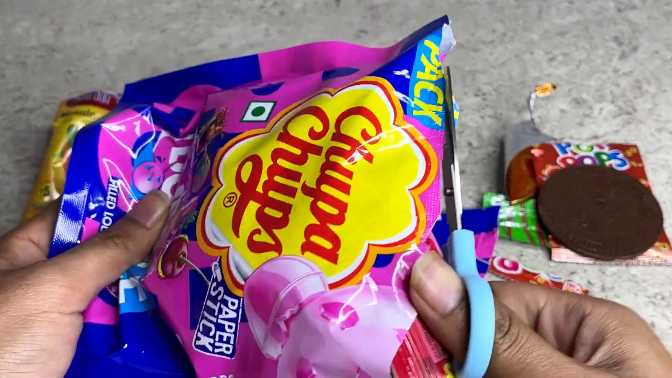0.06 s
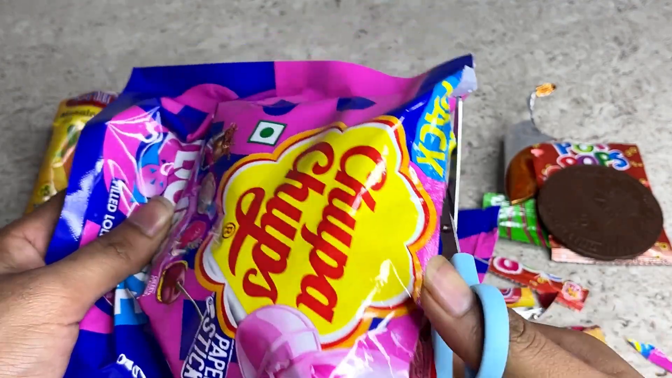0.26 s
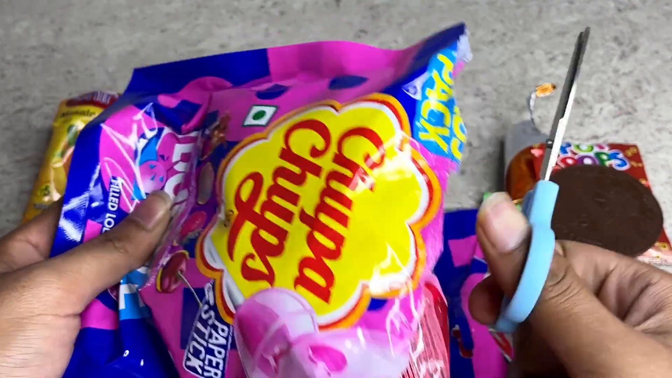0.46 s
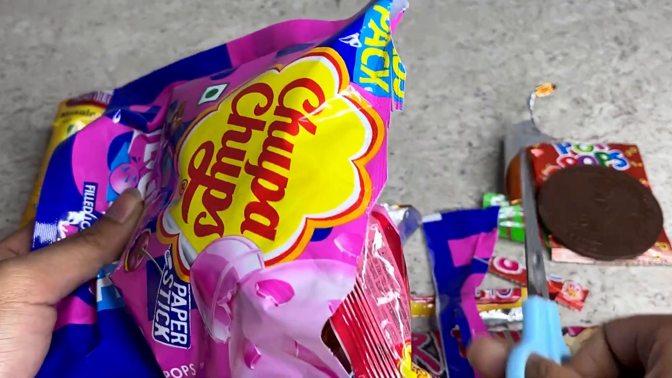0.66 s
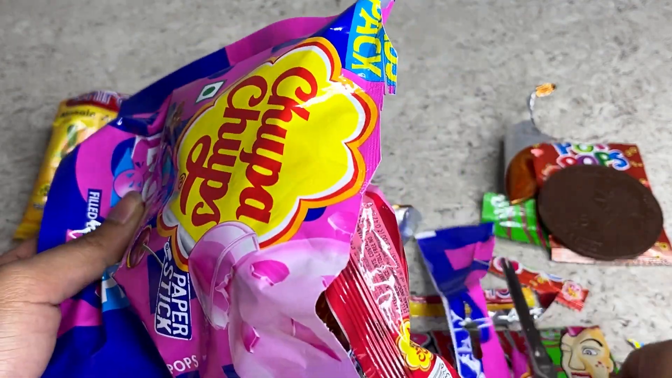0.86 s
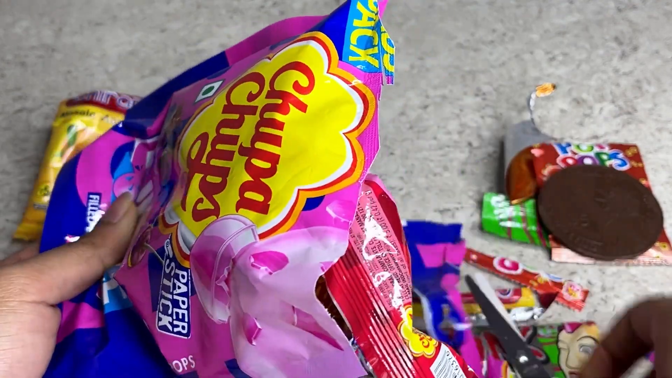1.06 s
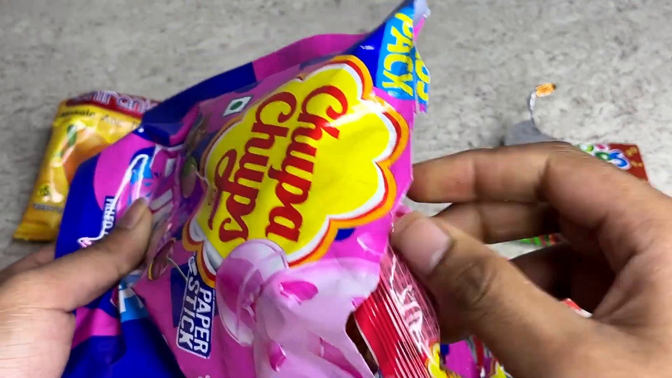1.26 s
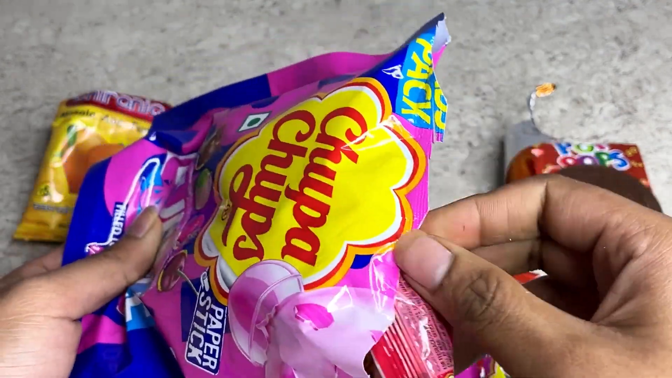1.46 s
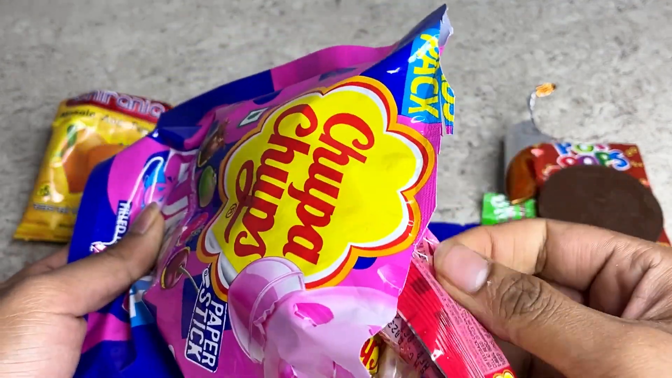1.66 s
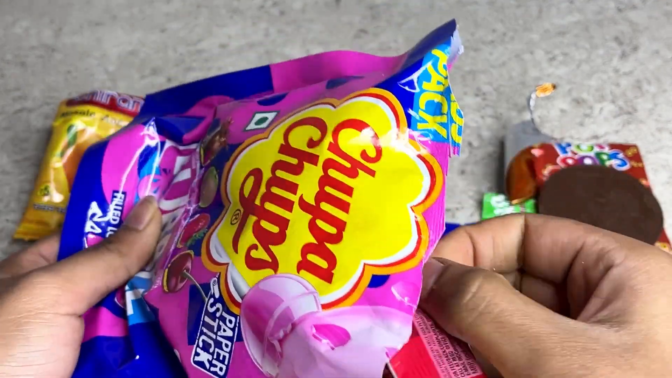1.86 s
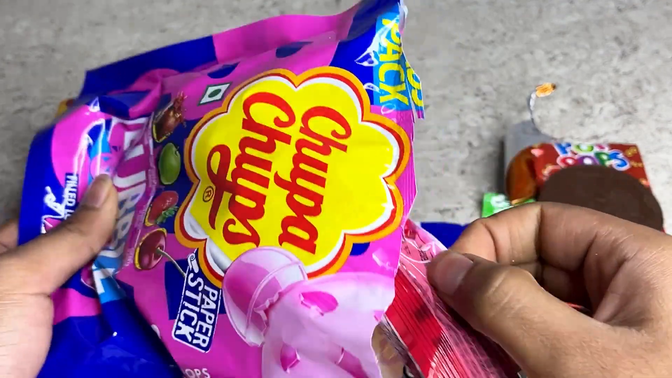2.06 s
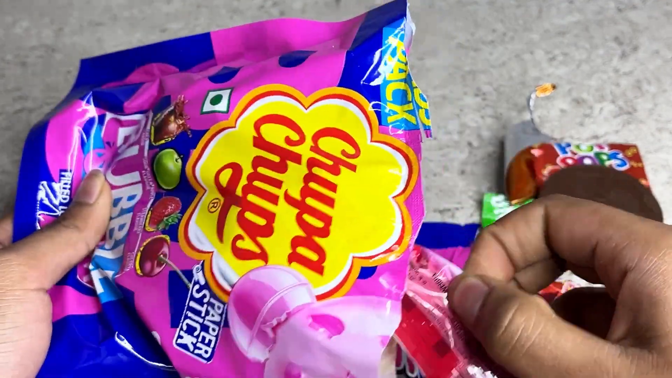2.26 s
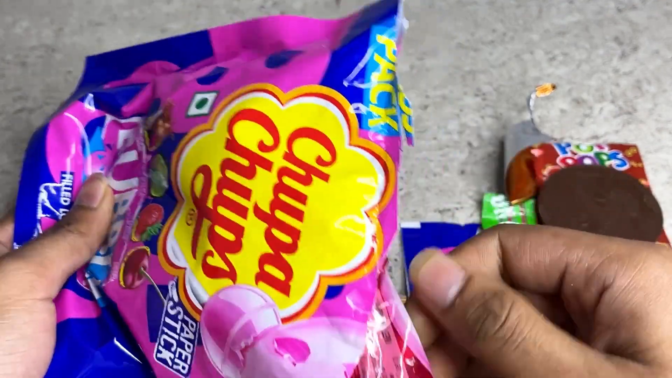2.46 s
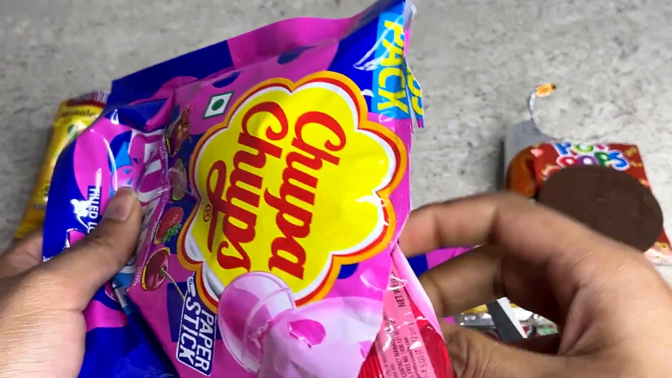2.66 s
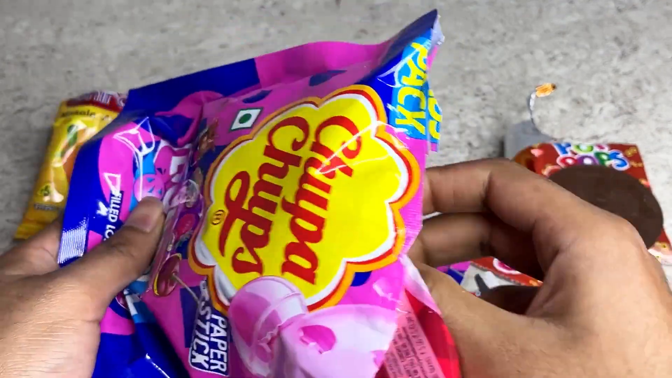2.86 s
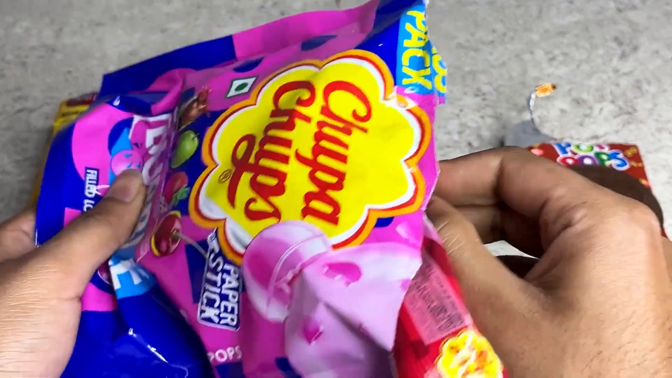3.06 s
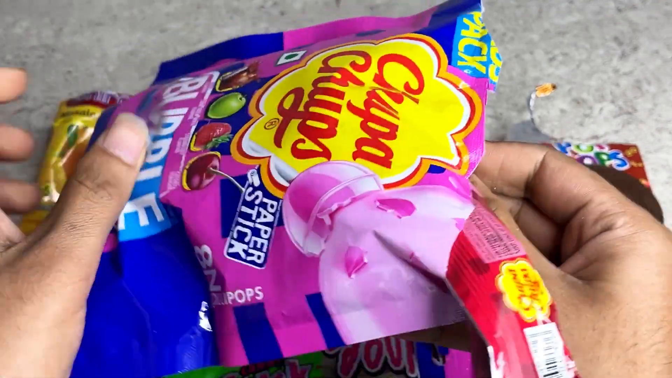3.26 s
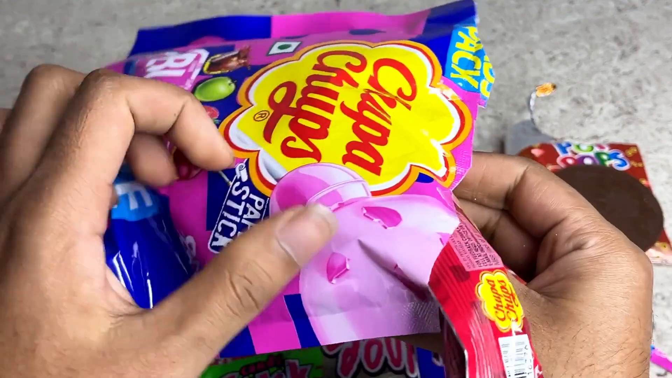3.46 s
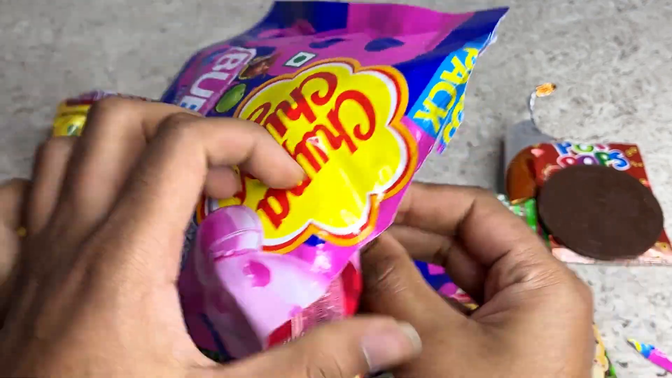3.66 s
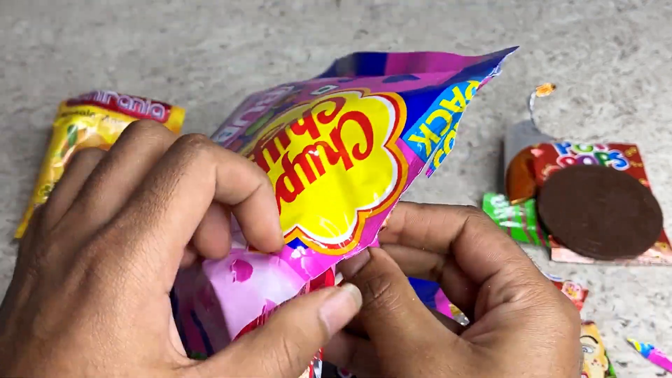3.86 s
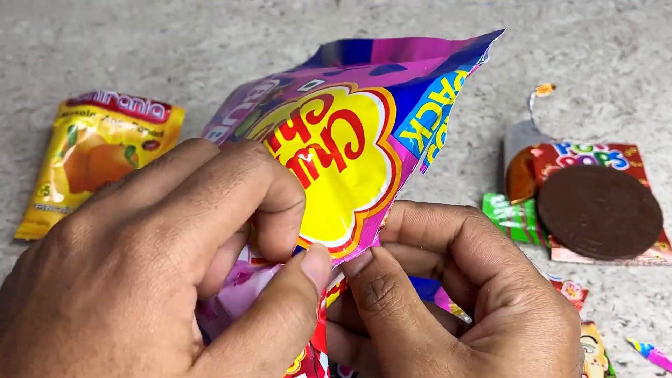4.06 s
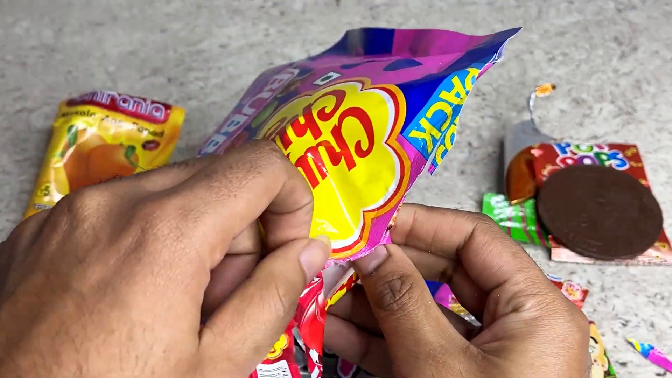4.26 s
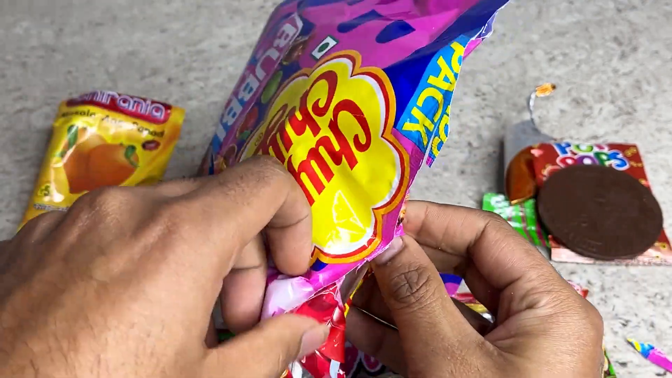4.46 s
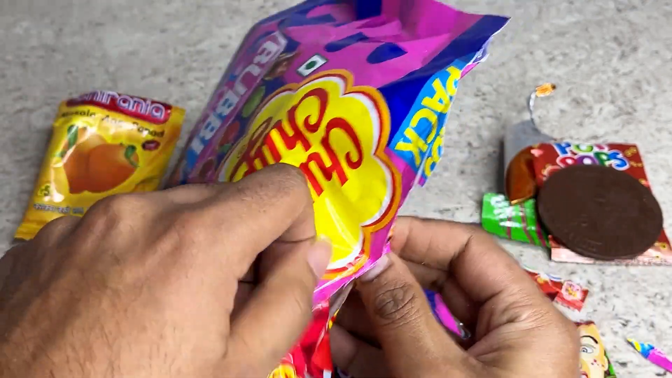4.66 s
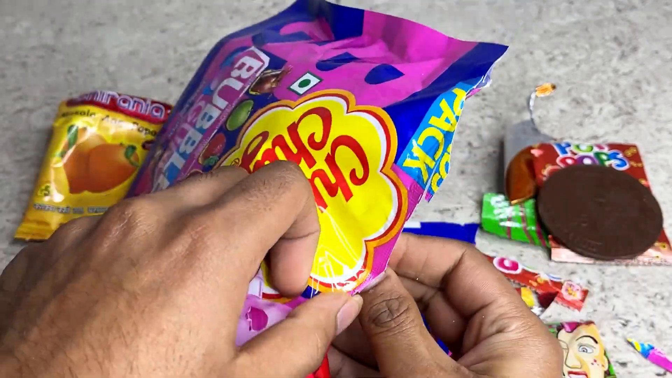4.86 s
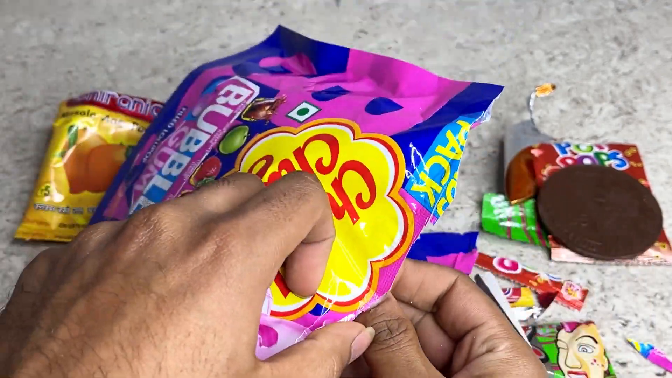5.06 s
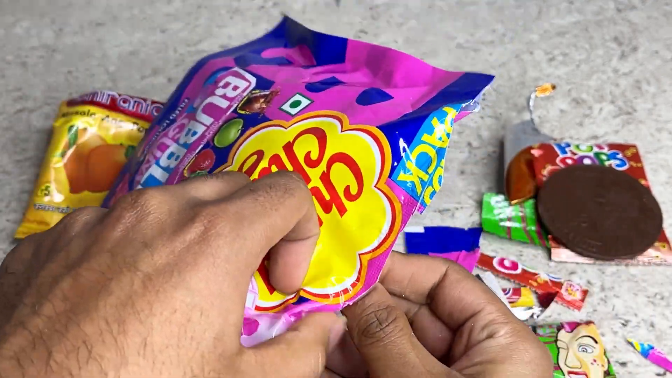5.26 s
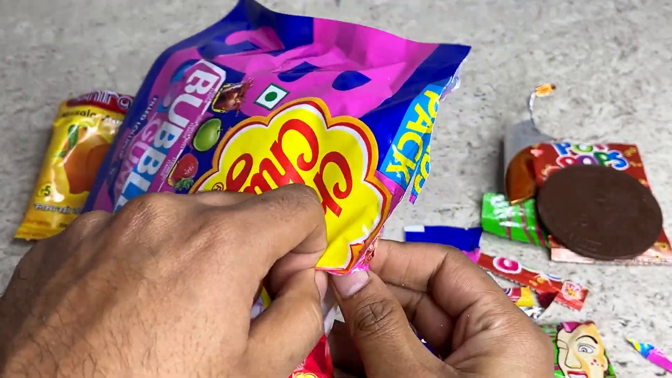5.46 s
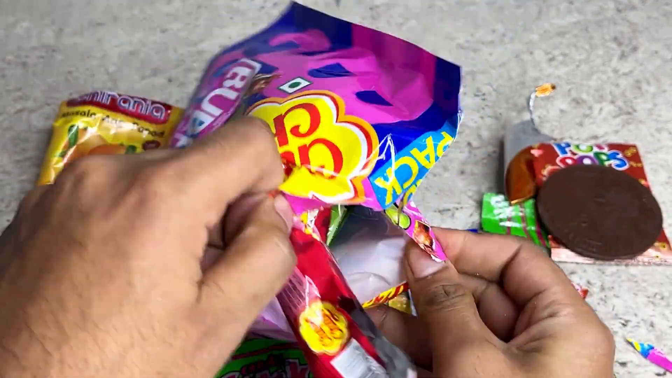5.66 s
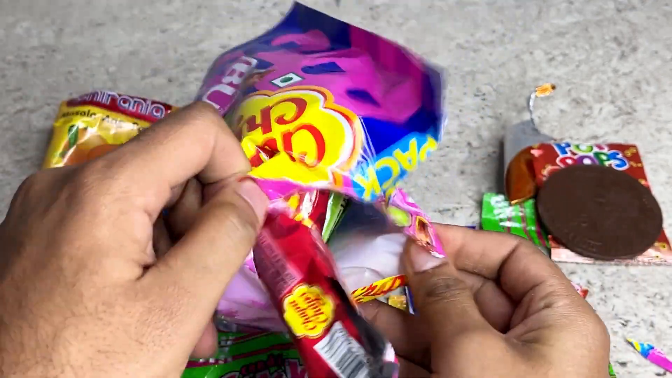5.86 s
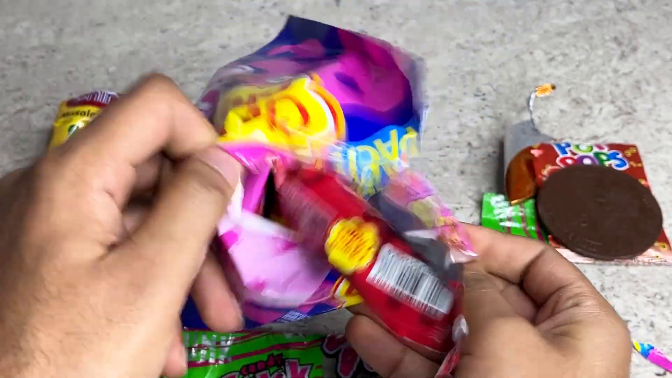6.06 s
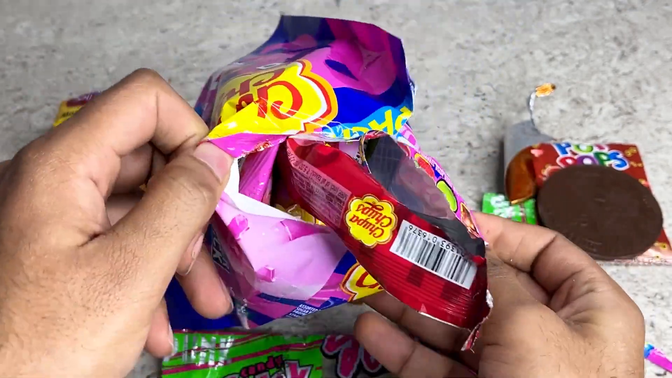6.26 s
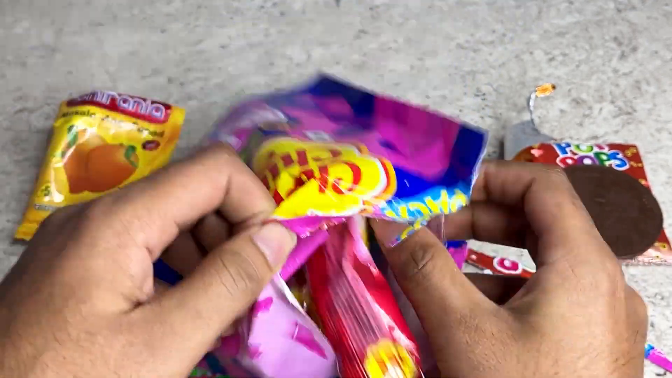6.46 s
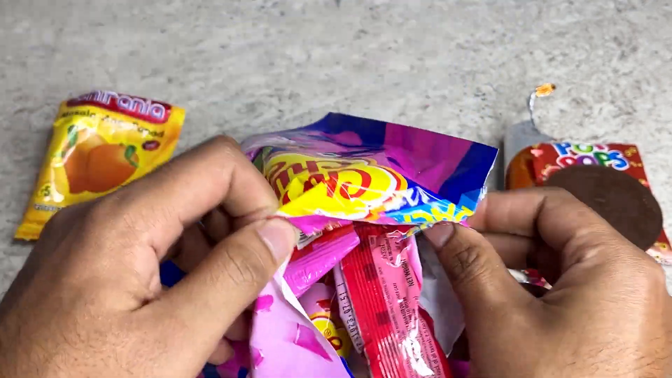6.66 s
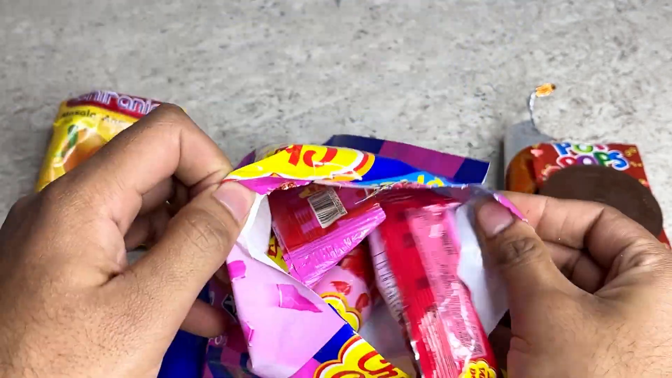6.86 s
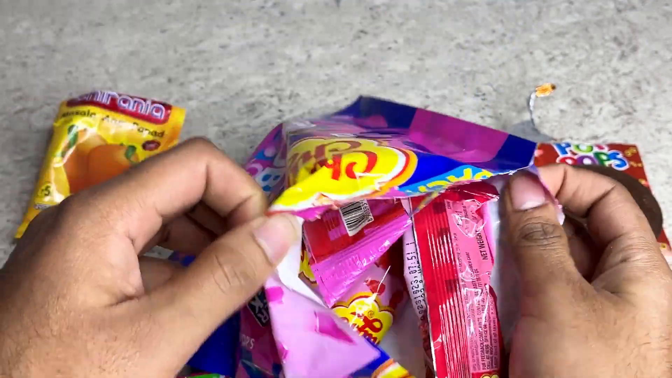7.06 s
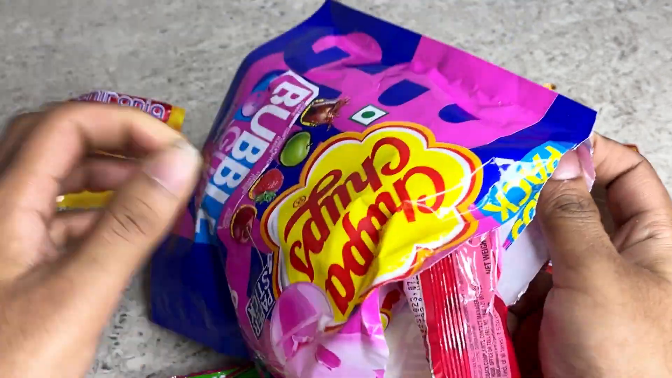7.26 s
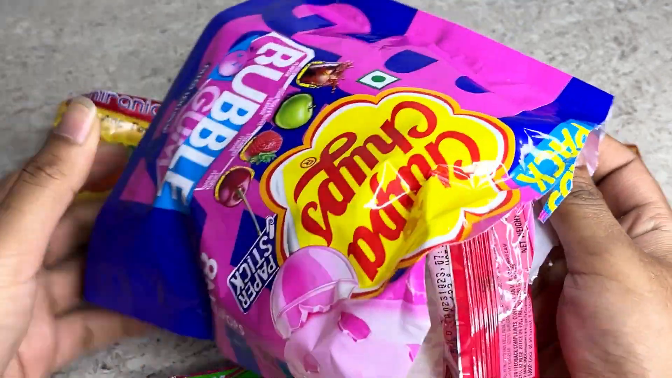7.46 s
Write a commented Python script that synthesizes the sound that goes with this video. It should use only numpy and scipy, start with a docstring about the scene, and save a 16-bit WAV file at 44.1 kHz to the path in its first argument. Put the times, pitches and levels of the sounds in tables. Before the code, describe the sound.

Close stereo pickup of crisp plastic film: a quick cluster of snaps, a near-pause with a few small clicks, steady crinkling growing busiest around the middle, softer fidgeting, then abrupt hard tearing crackles and another rustle before quiet. Each crease is a dry, bright tick with a short room tail; quiet low rumble and slight hiss continue throughout.

```python
"""Snaps and fine crackle of stiff plastic film, close up in a small hard room, over a low rumble and faint hiss:
hands cut, grip and tear open a bag of wrapped sweets in front of a two-port microphone.
Each buckling crease is a crack in a short noise burst plus a decaying ring, with its own colour and pitch.
Listed snaps stand over random crackle that swells with each tug; decaying noise patterns make the room's tail."""
import sys
import numpy as np
from scipy import signal
from scipy.fft import rfft, irfft, next_fast_len
from scipy.io import wavfile

SR = 44100
rng = np.random.default_rng(int(sys.argv[2]) if len(sys.argv) > 2 else 0)


def persist_wave(psi):
    """Save psi, clipped to +-1, as 16-bit WAV."""
    counts = np.round(np.clip(psi, -1, 1) * 32767).astype(np.int16)
    wavfile.write(sys.argv[1], SR, np.atleast_2d(counts).T)


def volts_from_db(level):
    """Convert decibel levels to linear amplitude ratios."""
    exponent = np.asarray(level, float) / 20
    return 10 ** exponent


N = 331191

# where a buckle's colour is set: (frequency [Hz])
COLOUR_HZ = [300, 950, 2200, 4200, 9000]
MIDDLE_PITCH_HZ = 3000


def rms_one(x):
    """Scale to rms 1."""
    return x / np.sqrt(np.mean(x ** 2) + 1e-20)


def in_time(rows):
    """Columns of a curve, one value per sample."""
    s, *columns = np.transpose(rows)
    t = np.arange(N) / SR
    return [np.interp(t, s, column) for column in columns]


def at_hz(points, hz):
    """Read a table on a log-frequency axis."""
    table_hz, value = np.transpose(points)
    return np.interp(np.log(hz + 1), np.log(table_hz + 1), value)


def drift(rate_hz):
    """Slow chance with spread 1: noise through a double pole, run at SR / 40."""
    pole = np.exp(-80 * np.pi * rate_hz / SR)
    noise = rng.standard_normal(N // 40 + 2002)
    slow = signal.lfilter([1], [1, -2 * pole, pole * pole], noise)[2000:]  # settled part
    return np.interp(np.arange(N) / 40, np.arange(len(slow)), rms_one(slow))


def bands():
    """Half-octave band-passes: (centre Hz, filter)."""
    edges_hz = 60 * 2 ** np.arange(0, 8.6, .5)
    pairs = []
    for low, high in zip(edges_hz, edges_hz[1:]):
        band = signal.butter(2, [low, min(high, .45 * SR)], "band", fs=SR, output="sos")
        pairs.append((np.sqrt(low * high), band))
    return pairs


def room_tone():
    """Low swelling rumble and faint hiss: shaped noise, one row shared by the ports and one differing."""
    # spectrum shape: (frequency [Hz], relative density [dB per Hz])
    tone = [(30, -12), (50, 13.5), (75, 0), (130, 1), (180, -12.5), (500, -10.5), (1200, -40), (3200, -18),
            (5000, -34.5), (10000, -41), (16000, -59)]
    # swell: (time [s], level [dB])
    swell = [(0.0, -57), (0.6, -57.5), (3.22, -52), (5.3, -60), (6.3, -54.5), (7.51, -58)]
    hz = np.arange(N // 2 + 1) * SR / N
    noise = irfft(rfft(rng.standard_normal((2, N))) * volts_from_db(at_hz(tone, hz)), N)
    return volts_from_db(in_time(swell)[0]) * rms_one(noise)


def echoes(x):
    """Reflections: noise dying band by band after a gap; as the bag moves, four patterns blend in drifting shares."""
    # decay: (frequency [Hz], t60 [s])
    room_t60 = [(100, 0.37), (500, 0.34), (1400, 0.42), (3700, 0.29), (9700, 0.23), (16000, 0.13)]
    gap_s, bag_moves_hz = 0.0016, 6.65
    t = np.arange(SR // 2) / SR
    tail = 0
    for hz, band in bands():
        noise = rms_one(signal.sosfilt(band, rng.standard_normal((4, 2, len(t)))))
        tail = tail + np.sqrt(hz) * noise * volts_from_db(-60 * t / at_hz(room_t60, hz))  # starts equal per Hz
    tail = tail * np.clip(t / gap_s - .5, 0, 1)
    blend = np.array([drift(bag_moves_hz) for _ in tail])
    blend = blend / np.sqrt(np.sum(blend ** 2, axis=0))
    wet = 0
    for share, pattern in zip(blend, tail):
        pattern = pattern / np.sqrt(np.sum(pattern ** 2) / 2)
        wet = wet + signal.fftconvolve(x * share, pattern, axes=1)[:, :N]
    return wet


def effort():
    """Crackle level and treble share: steady handling plus tugs that rise fast, hold and let go."""
    # steady handling: (time [s], crackle level [dB], treble share [dB])
    handling = [(0, -49, -8.5), (.1, -70, -3), (.4, -53, -5.5), (.6, -82, -16), (.84, -80, 3),
                (.88, -61, 10.5), (1.3, -62, -11), (1.6, -65, -6), (2.97, -56.5, -10), (3.5, -56.5, -10),
                (4.0, -59.5, -8), (4.35, -70, -14), (4.64, -56.5, -6), (5.05, -72, -16),
                (5.27, -52.5, -8.5), (5.7, -62.5, -5), (6.2, -60, -7.5), (6.45, -51.5, -6.5),
                (6.72, -56.5, -1.5), (7.15, -52.5, -7.5), (7.3, -68.5, -18), (7.51, -88, -10)]
    # tugs that rip or crumple the bag: (start [s], length [s], crackle level [dB])
    tugs = [(0.296, 0.072, -48.5), (5.546, 0.093, -40.5), (5.842, 0.022, -42), (6.035, 0.045, -40.5),
            (6.664, 0.075, -40.5)]
    attack_s, release_db_per_s = 0.0062, 253
    crackle_db, treble_db = in_time(handling)
    t, gain = np.arange(N) / SR, volts_from_db(crackle_db)
    for start_s, length_s, db in tugs:
        rise = np.clip((t - start_s) / attack_s, 0, 1)
        late_s = np.maximum(t - start_s - length_s, 0)
        gain = gain + rise * volts_from_db(db - release_db_per_s * late_s)
    return 20 * np.log10(gain), treble_db


def crackle(per_s, size_db, largest, clump_db):
    """Smaller buckles at random, in clumps, most of them faint: rows like the snaps, times in samples."""
    bass_offset_db, colour_spread_db, pitch_spread_octaves = -9, 3.5, .55
    crackle_db, treble_db = effort()
    chance = per_s * volts_from_db(clump_db * drift(25.0)) / SR
    at = np.flatnonzero(rng.random(N) < chance)
    extra_db = size_db * np.minimum(rng.exponential(1, N), largest)[at]
    bass, treble = colour_spread_db * rng.standard_normal((2, N))[:, at]
    pitch_hz = MIDDLE_PITCH_HZ * 2 ** (pitch_spread_octaves * rng.standard_normal(N)[at])
    bass_db = bass_offset_db + bass
    return np.column_stack([at, crackle_db[at] + extra_db, bass_db, bass_db / 2, pitch_hz, treble_db[at] + treble])


def patches(at, spread_db):
    """Patches of the film sound unevenly: a chance level per buckle for each band [dB]."""
    patch = rng.standard_normal(N + 64)
    return [spread_db * patch[at + 3 * k] for k in range(len(bands()))]


def film(buckles, own_db):
    """Each buckle is a crack in a noise burst that dies faster in the treble; rows: shared, differing."""
    # radiation on top of each buckle's colour: (frequency [Hz], gain [dB])
    radiation = [(70, -2.5), (150, -4), (300, 6.5), (900, 10), (1600, 10), (2800, 13), (5000, 13.5),
                 (9000, 14), (13000, 9.5), (17500, -18)]
    # how long a buckle shakes the film: (frequency [Hz], t60 [s])
    shake = [(100, 0.012), (600, 0.0075), (3000, 0.0075), (12000, 0.005)]
    rise_s, crack_db, early_cycles = 0.0008, 5, 0.57
    tilt_db_per_octave, burst_mid_db = 2, -3.5
    at, peak_db = buckles[:, 0].astype(int), buckles[:, 1]
    tilt_db = tilt_db_per_octave * np.log2(buckles[:, 4] / MIDDLE_PITCH_HZ)  # pitch tilts the burst
    lower_mid_db = burst_mid_db + np.minimum(-tilt_db, 0)
    upper_mid_db = burst_mid_db + np.minimum(tilt_db, 0)
    colour_db = np.column_stack([buckles[:, 2:4], lower_mid_db, upper_mid_db, buckles[:, 5]])
    shaking, out = rng.choice([-1., 1.], (2, 2, N)), np.zeros((2, N))
    rise = np.exp(-1 / (rise_s * SR))
    for k, (hz, band) in enumerate(bands()):
        place = np.interp(np.log(hz), np.log(COLOUR_HZ), np.arange(5))
        weights = np.maximum(1 - abs(place - np.arange(5)), 0)
        kicks = np.full(N, 1e-18)
        np.add.at(kicks, at, volts_from_db(peak_db + colour_db @ weights + own_db[k]))
        fall = volts_from_db(-60 / (at_hz(shake, hz) * SR))
        burst = signal.lfilter([1 - rise], np.convolve([1, -rise], [1, -fall]), kicks)
        # the crease flips in one sharp crack
        flip = np.roll(kicks * shaking[0], round(rise_s * SR), axis=1)
        crack = volts_from_db(crack_db) * (-1) ** k * flip
        # start bass bands earlier, so their slow filters sound together with the crack
        early = round(early_cycles * SR / hz)
        narrow = np.sqrt(COLOUR_HZ[2] * 0.96 / hz)  # narrow bass bands pass less of the burst
        sound = signal.sosfilt(band, burst * shaking[k % 2] + crack)
        out += volts_from_db(at_hz(radiation, hz)) * narrow * np.roll(sound, -early, axis=1)
    return out


def rings(buckles):
    """The panel beside each crease swings up and dies at its own pitch; low panels manage fewer cycles."""
    ring_db, cycles_at_middle, peak_s = -3, 1.3, 0.001003
    at, peak_db, hz = buckles[:, 0], buckles[:, 1], buckles[:, 4:5]
    # low rings take the 1 kHz level
    low = np.log(COLOUR_HZ[2] / hz[:, 0]) / np.log(COLOUR_HZ[2] / COLOUR_HZ[1])
    level_db = ring_db + peak_db + np.clip(low, 0, 1) * buckles[:, 3]
    phase = 2 * np.pi * rng.random(N)[at.astype(int), None]
    swing_s = cycles_at_middle / np.sqrt(hz * MIDDLE_PITCH_HZ)
    t = np.arange(180) / SR
    swing = t / swing_s * np.exp(1 - t / swing_s)
    wave = volts_from_db(level_db)[:, None] * swing * np.exp(1j * (2 * np.pi * hz * t + phase))
    where = np.maximum(at[:, None] + (peak_s - swing_s + t) * SR, 0).astype(int).ravel()
    return np.array([np.bincount(where, path.ravel(), N + SR)[:N] for path in (wave.real, wave.imag)])


def ports(shared, differing):
    """Two ports hear the shared sound with a frequency-dependent lead and balance."""
    # (frequency [Hz], phase by which the left port leads [rad])
    port_lead = [(0, 0), (430, -.3), (1380, .1), (2070, .5), (3010, -.6), (3960, -.1), (5000, -.15),
                 (5300, 2.0), (6500, 2.3), (6950, 3.14), (7500, 4.9), (8300, 6.1), (9400, 6.35),
                 (11000, 7.9), (12300, 9.3), (12800, 9.42), (13500, 10.07), (14200, 10.9), (15200, 11.9),
                 (16500, 12.3)]
    # (frequency [Hz], left minus right [dB])
    port_balance = [(100, -.3), (800, -1), (1800, -2.5), (2800, 4.5), (3600, -0.5), (16000, 0.5)]
    # gain of the differing part: (frequency [Hz], gain [dB])
    unalike = [(50, -20), (300, -13), (600, -9), (1400, -8), (2200, -9), (3000, -16), (4200, -19),
               (6000, -11), (7000, -18), (7700, -11), (9200, -18), (10400, -11), (12600, -20), (15000, -9)]
    size = next_fast_len(N + 4096)
    hz = np.arange(size // 2 + 1) * SR / size
    lead = np.interp(hz, *np.transpose(port_lead))
    half = volts_from_db(at_hz(port_balance, hz) / 2) * np.exp(.5j * lead)
    mid = rfft(shared, size)
    side = rfft(differing, size) * volts_from_db(at_hz(unalike, hz))
    return irfft(np.array([(mid + side) * half, (mid - side) / half]), size)[:, :N]


def scene():
    """Snaps and crackle of the film, their echoes and the room tone, heard at two ports."""
    # loudest snaps, levels ahead of the film's radiation: (time [s], level at 2 or 4 kHz, the stronger [dB],
    # relative level at 300 Hz [dB], at 1 kHz [dB], ring pitch [Hz], relative level at 9 kHz [dB])
    snap_rows = [(0.0114, -30.0, -14, 0, 2200.0, -9.0), (0.0218, -34, -6.0, 3, 4830, -7),
                 (0.031, -35, 9.5, 8, 1090, -19), (0.039, -37, -5, 8, 1650.0, -20),
                 (0.0493, -40, -13, -4.0, 2700.0, -13), (0.0866, -23.5, -10, 4.5, 2820, -18),
                 (0.1052, -23.5, -21, -16.0, 2150.0, -8), (0.113, -19.0, -10.0, -6, 2010, -2.5),
                 (0.134, -21.5, -18, -4, 900.0, -4.0), (0.139, -22.5, -13, -1, 1110, -8),
                 (0.145, -29, -5, -7, 4600, 5.0), (0.2356, -19.5, -22, -3, 1230, -6),
                 (0.251, -22, -9, -11, 4200.0, 1), (0.3172, -25.5, -14.0, -11, 4950.0, -12),
                 (0.3222, -22, -19, -11.0, 5100.0, -6.0), (0.3326, -19.5, -0.0, -6, 2900.0, -8),
                 (0.3378, -20.5, -1, 7, 2820, -18), (0.357, -18.5, -9, -5, 2680, -7),
                 (0.3637, -20.5, -11, -3, 2440, -4), (0.3742, -22.5, 7, -3, 910, -7),
                 (0.3888, -24.5, 4.5, -4.0, 3180, -21), (0.4056, -30, -11, -7, 2130, -17),
                 (0.4778, -26, -15, -17, 3100.0, -4), (0.5821, -40, -20, -25, 2800.0, -24),
                 (0.5926, -34, -14, -5.5, 1110, -25), (0.6532, -38, -9, 0, 2450.0, -38),
                 (0.7236, -37.5, -7, 5.5, 1080, -36), (0.7621, -32.5, -25, -5, 1310, -27),
                 (0.841, -36, -25, -2, 3050.0, -24), (0.8638, -25.5, -25, -10.0, 2570, -6),
                 (0.875, -28.5, -35, -6.0, 2700.0, 1), (0.892, -26, -22, -21, 4550, -2),
                 (0.9177, -35, -23.0, -28.0, 4630, 0), (0.9407, -21.5, -27, -18, 3850.0, -8.0),
                 (1.0453, -18.5, -31, -4, 3640, -16), (1.0665, -22.5, -12, -12, 2900.0, -17),
                 (1.0718, -23.5, -22, 2, 4800, -20), (1.136, -26, -10, -2, 1060, -17),
                 (1.1784, -32.0, -20, -24, 2800.0, -3), (1.3182, -29, -6.0, -5, 3520, 3.5),
                 (1.3394, -25.0, -26.0, -24, 4900.0, 2.5), (1.3754, -31.0, -18.0, -20, 3250.0, -10),
                 (1.4495, -39, -26.0, -18.0, 4750.0, -10.0), (1.4613, -21.5, -18, -12, 4830, -4.0),
                 (1.4667, -28.5, -2, -7, 2800.0, -4), (1.5189, -31.0, -8, -13, 2050.0, -24),
                 (1.556, -29, -10, -8, 3500.0, 2), (1.5649, -27.5, 3, 2, 4850.0, -2),
                 (1.5969, -31, -8, 0, 3150.0, -7), (1.6083, -24.5, -10, -16, 4900.0, 1),
                 (1.6192, -24, -7.5, -5, 4800.0, 2.0), (1.625, -17.5, -29, -17, 2800, -9),
                 (1.636, -26.5, -26.0, -8, 4600.0, -9), (1.646, -16.5, -19, -8.0, 2800.0, -10.0),
                 (1.653, -27.0, -13.0, -15, 3150.0, 0), (1.6677, -28.5, -4, 2.0, 3000.0, -10),
                 (1.6899, -25.5, -11, -5.0, 5050.0, 4), (1.7247, -19.0, -10.5, -10, 2900, -19),
                 (1.7786, -32.5, -3, -1, 2150.0, -11), (1.8006, -34.0, -3, 2, 1050.0, -19.0),
                 (1.8087, -28, -3, -6, 2830, -22), (1.831, -29.5, -12, 4, 1580, -15.0),
                 (1.8372, -31, -12.0, -6, 2820, 5.0), (1.8716, -25.0, -8, 0.5, 3000, -21),
                 (1.8869, -29.5, -12, -2, 2950.0, -20), (1.9781, -24, -12, -5, 3000.0, -4),
                 (1.9906, -18.5, -22, 0, 3000.0, -6), (1.9995, -19, -7, -10, 2840, -10.0),
                 (2.008, -19.5, -11.0, -6, 2770, -6), (2.0352, -21, -9, -7.0, 2880, -7),
                 (2.0697, -29, -4.0, 0, 1300.0, -22), (2.0836, -33.0, -5.0, 5, 1140, 1),
                 (2.0959, -23, -15, -26, 2550.0, -12.0), (2.1065, -37, -19.0, -17, 2800.0, -23.0),
                 (2.1429, -19.5, -29, -25, 4550.0, 1), (2.183, -29.5, -16, -4.0, 2100.0, -5),
                 (2.1871, -22, -16, -10.0, 4550.0, 1), (2.2042, -23.5, -12, -4, 4600.0, -6),
                 (2.2167, -26.0, -6, -6, 2370, -13), (2.26, -28.5, -10, 0.5, 1170, -1),
                 (2.2783, -17.0, -37, -20, 2110, -17), (2.2891, -11, -33, -14, 4000.0, -12),
                 (2.2947, -27, -38.0, -6, 2600.0, -23.0), (2.3249, -30.5, 0, 0, 1700.0, 3),
                 (2.3762, -32.5, 3, -1, 1160, -1), (2.4128, -13, -25.0, -18, 4200.0, -9),
                 (2.4208, -30.5, -3, 1, 1570, 5), (2.4299, -29, -2, -2, 2600.0, -17),
                 (2.4826, -33, -25, 4, 3150.0, -11.0), (2.4948, -21.0, -19, -3, 2170, 2),
                 (2.505, -22, -30, -15, 3000.0, -10.0), (2.5146, -19.5, -19, -9.0, 2780, -6),
                 (2.5184, -20, -17, -12, 4800.0, -7), (2.5335, -21.5, -18, -11.0, 3000.0, -3.5),
                 (2.569, -21, -9, -10, 3000.0, -27), (2.5991, -19.5, -12.0, -7, 3150.0, -9),
                 (2.609, -24, -3, 3.5, 1560, 0), (2.6237, -15.5, -28, -30, 2920, -8.5),
                 (2.6297, -21.5, -20.0, -11.0, 2950.0, 2.0), (2.6336, -16.5, -22.0, -17, 3230, -6),
                 (2.6497, -28, -12, -3, 3100.0, -11.0), (2.6887, -27.5, -21, -18, 2850.0, -5),
                 (2.712, -20, -2.5, -9.5, 2750.0, -17.0), (2.7486, -24.5, -11, -1, 1090, -8),
                 (2.764, -27, -11, 0, 2650.0, -11.0), (2.7748, -23, -8, -16, 2760, -11),
                 (2.7832, -21.5, -7.5, -9.0, 2780, -14.0), (2.7997, -19, -18, -6, 2900.0, -6),
                 (2.8235, -27.0, -8, 1, 4500.0, -21), (2.8363, -22.5, -13, -14, 2800.0, -3),
                 (2.8527, -23.5, -18, -8, 2750.0, -8), (2.8944, -13.5, -35, -18, 4430, -15),
                 (2.9451, -20.5, -21, -12, 2880, -6), (2.9529, -21, -15, -17.0, 2900.0, 0),
                 (2.9603, -24.0, -16, 0, 1250.0, -12), (2.974, -17.5, -29, -3, 3900.0, -9),
                 (2.9825, -24, -17.0, -12.0, 2800.0, -15), (2.9992, -14.5, -6, -11.0, 2880, -5),
                 (3.011, -17.5, -11, -10, 2750.0, -6), (3.0262, -14, -13, -10, 4650.0, 1),
                 (3.0352, -15.0, -25, 1, 4350.0, -12), (3.0519, -19.5, -11, -8, 2700.0, 3),
                 (3.0633, -22, -12.0, -10, 5000.0, -9), (3.087, -22, -1, -7, 2950.0, -15.0),
                 (3.1148, -25.5, -19, -6.0, 2730, -7), (3.1229, -30.5, 7, 1, 1260, -6.0),
                 (3.1457, -27.5, -17.0, 2, 2900.0, -3), (3.1533, -25.5, -17, 1, 3230, -10.0),
                 (3.163, -29.5, -1, -7, 3000.0, -1), (3.1723, -32, -8, 1, 1820, -10),
                 (3.2056, -26.5, -9, -1, 1850.0, -15), (3.213, -21.5, -7, -7, 4460, 9.5),
                 (3.2363, -28.0, -2.0, -2, 4550.0, 0), (3.2404, -23, -4, -8, 4400.0, -4),
                 (3.25, -25.5, -4.0, 1.5, 1240, -18.0), (3.2641, -13, -15, -6.5, 1850.0, -18),
                 (3.2952, -20.0, -10, -20, 4400, -13), (3.3197, -25, 2, 1.0, 1150.0, -9),
                 (3.3426, -21.5, -4.0, -1.0, 2800.0, -10), (3.362, -22.5, -5, -2, 4450.0, -1),
                 (3.3678, -21, -26, -10, 4530, -8), (3.3776, -23.5, -11, -4, 2640, -6),
                 (3.3874, -25.5, -14, -6, 3380, 3), (3.4317, -21.5, -24, -4, 4050.0, -8),
                 (3.511, -23.5, 7, 1.5, 1200.0, -19), (3.5161, -17.5, -12, -3.0, 3860, -9.5),
                 (3.5487, -37, -7, 1, 1150.0, -13), (3.5677, -34.0, -23, 2, 1150.0, -6.0),
                 (3.6002, -33.5, -5, -9.0, 3420, 2), (3.6132, -27, -6, -14, 1850.0, -4),
                 (3.628, -25, -14, -3.0, 1700.0, -10), (3.638, -25.5, -14.0, -18, 4700, 0),
                 (3.653, -28, -24, -5, 2800.0, -5), (3.6823, -20.5, -20, -9.0, 3540, -7),
                 (3.7142, -24, -13, -6, 1660, -26.0), (3.7246, -25.5, -26, -8.0, 3970, -7),
                 (3.729, -27.5, -29.0, -13, 3700.0, 10.0), (3.7374, -34.5, -8, 10, 1010, 0.0),
                 (3.7423, -24, -12.0, -13, 3650, -9.0), (3.746, -24.5, -11.0, -2, 3500, -14.0),
                 (3.7797, -27, -23, -10, 3700.0, -3), (3.7908, -23, -7, -4, 3000.0, -11),
                 (3.8048, -32.5, -2, 1, 3050.0, -2), (3.8711, -37, -4, -7, 2150.0, -24),
                 (3.8836, -36.0, -3, 9, 3100.0, -14.0), (3.8965, -29, -11.0, -8, 2470, -17),
                 (3.9238, -35, -19, -9, 2930, -22), (3.9404, -37, -15, -9.0, 3650.0, -11),
                 (3.948, -32.0, -15.0, -8.0, 2920, -21.0), (3.9624, -29.0, -8, -13, 5000, -9),
                 (3.9844, -30.5, -17, -9, 4400.0, 3.0), (3.9888, -17, -21.0, -16, 5740, -6),
                 (4.007, -34, -12, -0.0, 2850.0, -22.0), (4.0165, -26.0, -19, -20, 3750.0, -14),
                 (4.022, -34, -31.0, -9.0, 2800.0, -13.0), (4.0307, -23.5, -23, -5, 3950.0, -9.5),
                 (4.0627, -31.5, 6.5, -4, 3650.0, 12), (4.0772, -27.5, -16, 3.5, 3070, 1),
                 (4.084, -19.5, -17.0, -5, 5080, -3), (4.1008, -22.5, -12, -13.0, 2750.0, -16),
                 (4.1281, -31, -15, -5, 5100.0, 12), (4.1842, -35.0, 2, 4, 3950.0, -2),
                 (4.2405, -21.5, -21.0, -7.5, 3280, -9.0), (4.2743, -36, -7.0, -5, 3430, -18),
                 (4.2788, -29.5, -5.0, 5, 3250.0, -2), (4.2939, -25, -7, -5, 4660, -4.5),
                 (4.319, -30, -17, -2, 1360, -13), (4.3564, -28.5, -9.0, -4, 5150.0, -3.5),
                 (4.3795, -26, -11, -9, 4700.0, -9.5), (4.3938, -30, -21.0, 1, 3700.0, -4),
                 (4.412, -45.0, -1.0, 14, 1100.0, -9.0), (4.4524, -33, 1, 3, 2850.0, -4.0),
                 (4.4738, -22.5, -17.0, -12, 3760, -3), (4.5, -25.5, -16, -6, 1610, -5),
                 (4.5068, -19.5, -18, -10, 3870, -2.0), (4.512, -26, -10, -10.0, 3750.0, -4.0),
                 (4.5246, -24, -21, -18.0, 3800, 4.5), (4.5327, -34, -4, 1, 4100.0, -10),
                 (4.5501, -26.5, -6, 0, 4050.0, 6.5), (4.5768, -29.5, -12.0, -6, 5400.0, 3.5),
                 (4.594, -33.0, 1, 0.0, 1000.0, -5.0), (4.6143, -34, -9.0, -12.0, 3800.0, -1),
                 (4.6443, -25.5, -8, -9, 3250.0, 1), (4.6531, -24, -9, -3, 4050.0, -3),
                 (4.6591, -33, -8, -14, 2400.0, -9.0), (4.6854, -28.0, -4, -3, 5330, -2.0),
                 (4.6895, -21, -11, -8, 2050, -1.5), (4.6956, -28, -2, -3.0, 4350.0, -19),
                 (4.7302, -29.5, -3, -3, 1550.0, -18), (4.7752, -32, -17.0, -17, 3000.0, -19.0),
                 (4.7936, -34, -19.0, -17, 4200.0, -2), (4.8066, -32, -17, -9, 4000.0, -12),
                 (4.8138, -42, -6, -12, 3000.0, -18.0), (4.8315, -28.5, -19.0, -10, 4450.0, -7.5),
                 (4.8913, -28, -24, -7, 4130, -6.0), (4.9137, -30.5, 3.5, -5, 3230, -8),
                 (4.9339, -33, -13, -3.0, 1450.0, -13), (4.9773, -39.5, 2, -7.0, 2160, -22.0),
                 (5.0013, -38, -21, -3, 1250.0, -21), (5.0861, -27.5, -26, -18, 4700, -1),
                 (5.0902, -35, -19, -13, 4400, -8.0), (5.165, -35.0, -12.0, -17, 3000.0, -2),
                 (5.1764, -31, -2, -1.5, 1400.0, -17.0), (5.2395, -26.5, -12, -7, 2430, -0.0),
                 (5.2522, -21.0, -17, -11, 4900.0, 2), (5.2556, -16.5, -14, -4.5, 2600, -6),
                 (5.2596, -20.0, -11, -11, 4700, -6.0), (5.2772, -15.5, -18, -11, 1750, -5.0),
                 (5.3176, -23.5, -4, -5.0, 4670, -4), (5.3231, -19.0, -9, -17, 4470, -10),
                 (5.4297, -23.5, -17, -8.0, 1830, -3.0), (5.4543, -30.0, -16, -11, 3100.0, -9),
                 (5.4644, -25.0, -29, -26, 2900.0, -14), (5.4827, -22.5, -34, 3, 3070, -14),
                 (5.4945, -21, -23.0, -20, 4730, -14), (5.5341, -22, -7, -6.0, 4500.0, -11),
                 (5.5453, -8.5, -17, -15, 3170, -9.5), (5.555, -19, -11, 3, 1550.0, -1),
                 (5.5618, -22, 0, -7, 3100.0, -2), (5.5721, -17, -8, 0.0, 3180, -6.0),
                 (5.5782, -15.0, -20, -13, 4460, -17), (5.5824, -12.5, -17, -7.0, 4050.0, -1),
                 (5.5969, -8, -18, -7, 1620, -10.0), (5.601, -17.0, -7, 0, 4700.0, -4),
                 (5.6247, -8.5, -4.5, -3, 3000.0, -28), (5.6414, -14, -12, -13, 3200.0, -5),
                 (5.6575, -22.0, -12, -12, 4450.0, -9), (5.8554, -13, 0, 4.5, 2730, -22),
                 (5.8606, -22.5, 5.0, -3, 950.0, -4), (5.8688, -19, -5, -18, 2780, -4),
                 (5.9239, -26.5, -3, -2, 3050.0, -5), (6.034, -11.5, -2, 0, 2630, -12),
                 (6.0387, -14.5, 1, 5, 3800, -2), (6.0454, -16, 3, 0, 3550.0, -7),
                 (6.054, -11, 1, -1.5, 2800, -9.0), (6.0672, -14.5, -7, -12, 2900.0, -5),
                 (6.0718, -16.5, 0, -8, 2850.0, -20), (6.0996, -21, -2, -7.0, 3100.0, -2.0),
                 (6.2663, -19.5, -14, -13, 2600, -9), (6.2928, -22, -11, -12, 4700.0, -1),
                 (6.3135, -30, -18, -5, 1800.0, -7.0), (6.327, -34, -3, 1, 1600.0, -3),
                 (6.351, -29, -6.0, -12, 4860, -2), (6.356, -24.0, -4, -6, 5040, -5),
                 (6.3802, -29, -1, -1, 5050.0, 2), (6.3857, -34, 2, -8.0, 2950.0, -5.0),
                 (6.4577, -26, -1.5, -5, 5030, 2), (6.4685, -23, 2, -3, 2650.0, -6.0),
                 (6.4824, -20.0, -12.0, -15, 2850.0, -14), (6.4899, -28.5, 1, -1.0, 3050.0, -3),
                 (6.4972, -28.5, -3, 5, 2600.0, -7), (6.5121, -25.0, -12.0, -17.0, 4350.0, -11.0),
                 (6.521, -30.5, -12, 4, 2300.0, -8), (6.5617, -31.0, -9, -4, 2700.0, -7),
                 (6.5931, -28.5, -7.0, 4.5, 3050.0, -9), (6.6179, -27.0, 5.5, 4, 4700, -3),
                 (6.6698, -21.5, -6, 4, 2920, 7.5), (6.6737, -15.0, -3, -1.0, 4750.0, 1.5),
                 (6.7104, -20.5, -6, -2, 3600.0, -4), (6.7222, -18, -4, -13, 5000, -4.0),
                 (6.7309, -21.5, -5.0, -18, 3100.0, 2), (6.757, -20, -3, -14, 5300, 1.0),
                 (6.773, -22, -4, -11, 4800.0, 4), (6.7902, -24, -13.0, -9, 4950.0, 2),
                 (6.8247, -24, -3, -11, 2800.0, -14), (6.8328, -17.5, -11, -17, 2950, -8),
                 (6.869, -21, -19, -15, 3300, -2), (6.9061, -19.5, -13, -9, 1020, -5),
                 (6.977, -36, -4, 3, 880, -16), (7.0525, -20.5, -9, -14.0, 2900.0, -7),
                 (7.059, -23.0, -6, 0, 3000, -22), (7.072, -33.5, -2.0, -6, 1700.0, 6),
                 (7.1183, -25, -3, -0.5, 1100.0, -21.0), (7.125, -29.5, 3, 1, 1830, -20.0),
                 (7.1318, -19.5, -4.5, -4, 3000.0, -4), (7.1646, -15.5, -19, -5, 5000, -8.5),
                 (7.1713, -25.0, -7, 1, 3100.0, -1), (7.1965, -25, -6, -2, 4800.0, -7.0),
                 (7.234, -24.0, -5, -10, 3120, -9), (7.2425, -27.5, -2, -16, 2620, -19),
                 (7.269, -37, -9, -6, 2620, 1), (7.297, -32, -9, -4.0, 1600.0, -18.0),
                 (7.311, -33.5, -3, -4.0, 4700.0, -11), (7.424, -44, -30.0, -16.0, 2830, -35),
                 (7.4771, -33.5, 2, -1.0, 2870, -32)]
    echo_db = -7.5
    snaps = np.array(snap_rows) * [SR, 1, 1, 1, 1, 1]  # times in samples
    grains = crackle(per_s=480.0, size_db=6.0, largest=2.32, clump_db=4.5)
    buckles = np.vstack([snaps, grains])
    spread_db = np.repeat([1.5, 5.0], [len(snaps), len(grains)])
    own_db = patches(buckles[:, 0].astype(int), spread_db)
    bag = film(buckles, own_db) + rings(buckles)
    return ports(*(bag + volts_from_db(echo_db) * echoes(bag) + room_tone()))


def low_pass(x):
    """Removes everything above the highest recorded frequency."""
    return signal.sosfilt(signal.butter(12, 16990, fs=SR, output="sos"), x)


def record(dry):
    """Cut the bass below the rumble and the treble above the top."""
    x = signal.sosfilt(signal.butter(2, 33.0, "high", fs=SR, output="sos"), dry)
    x = signal.sosfilt(signal.cheby2(10, 30, 16500.0, fs=SR, output="sos"), x)
    return low_pass(x)


dry = scene()
out = record(dry)
persist_wave(out)
```